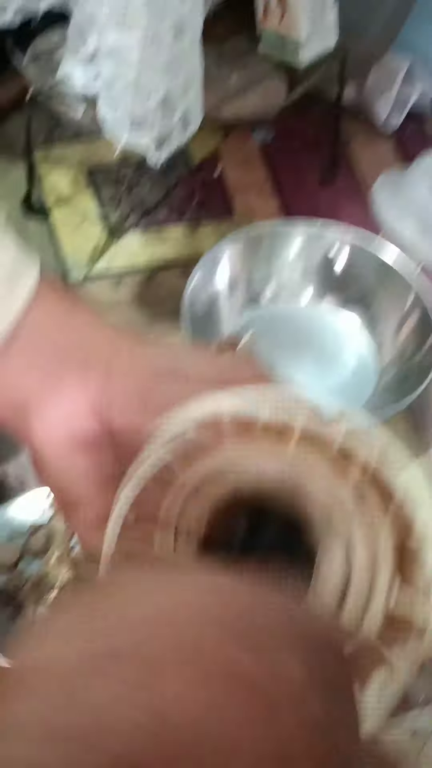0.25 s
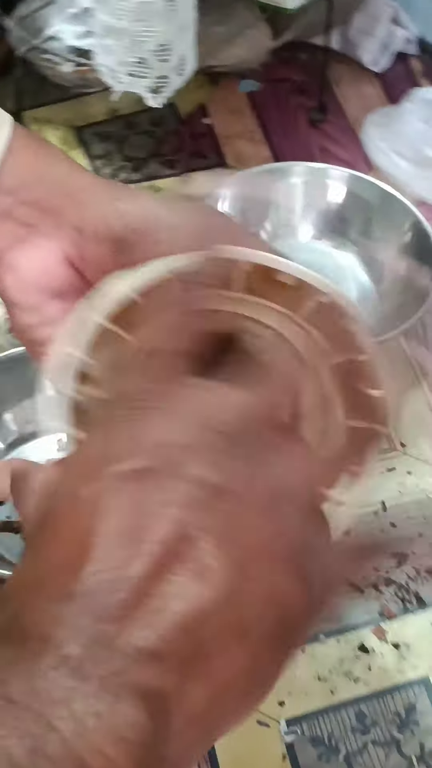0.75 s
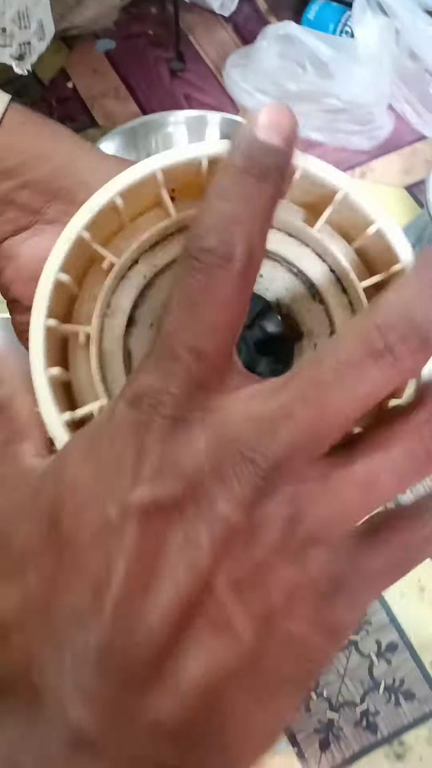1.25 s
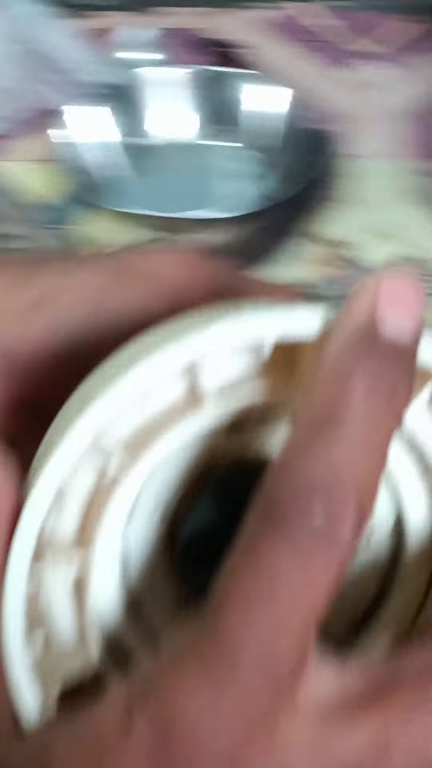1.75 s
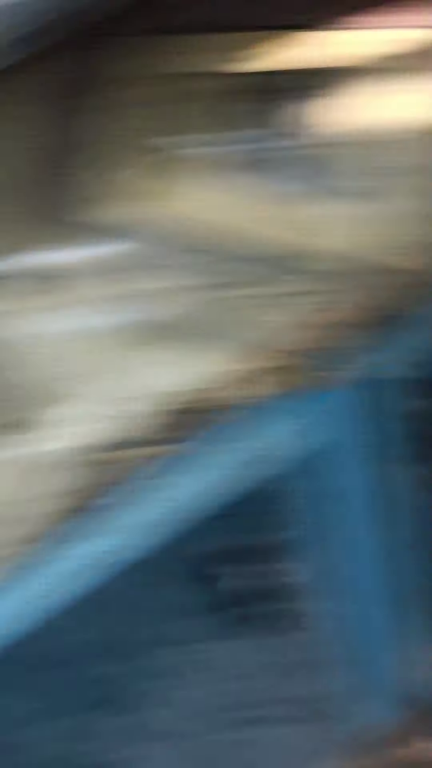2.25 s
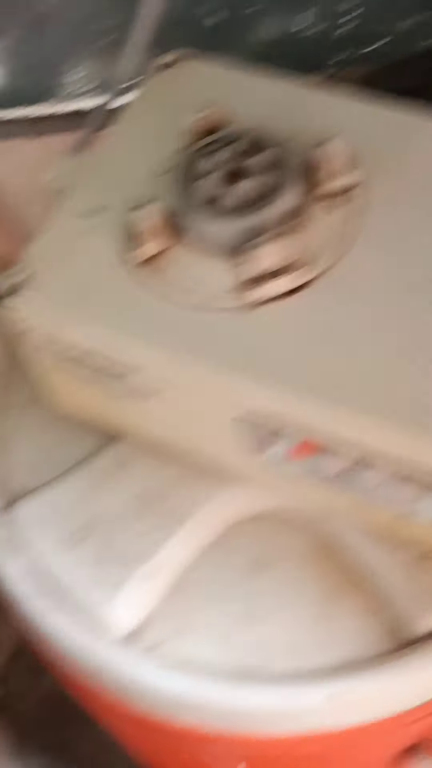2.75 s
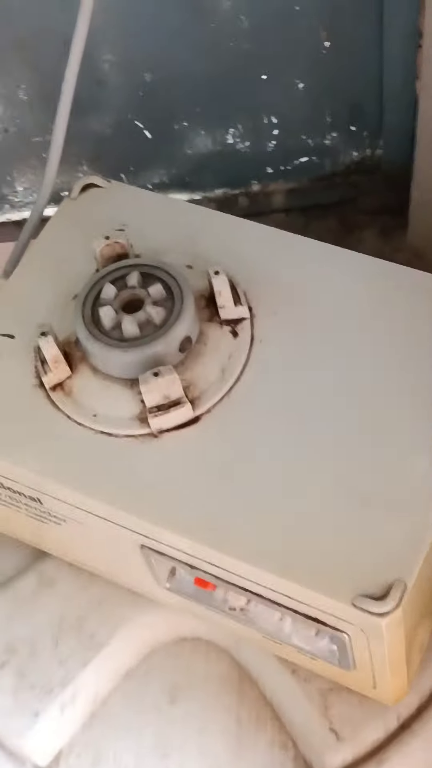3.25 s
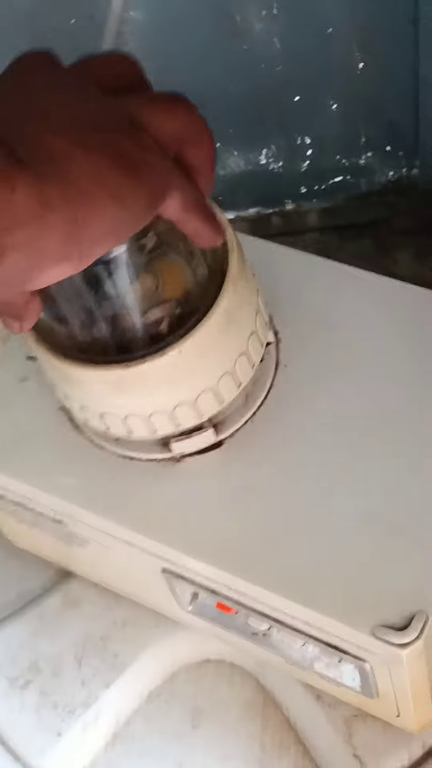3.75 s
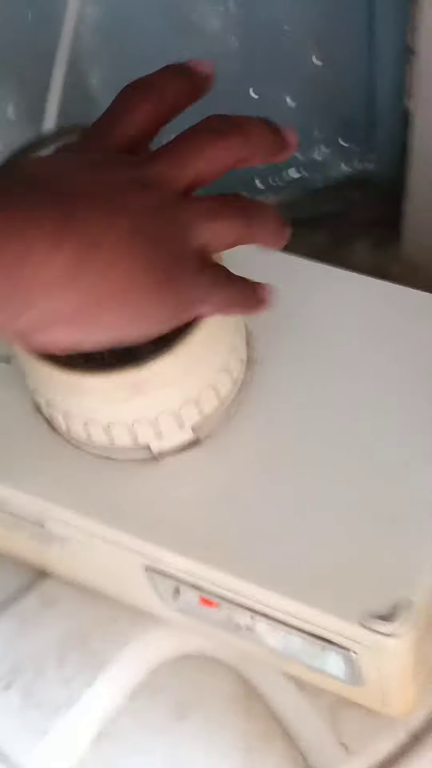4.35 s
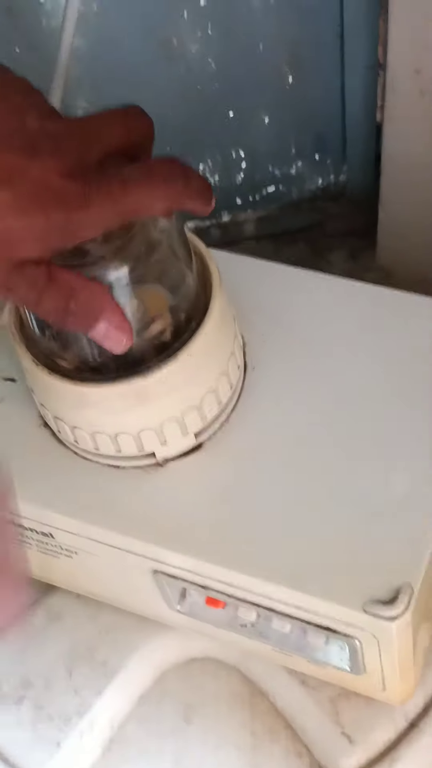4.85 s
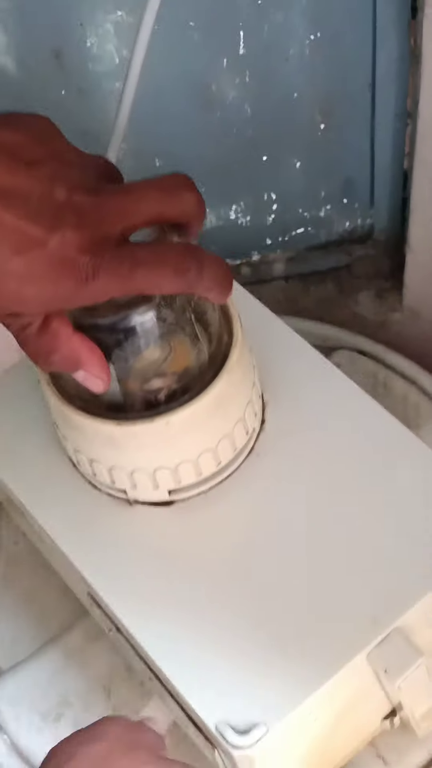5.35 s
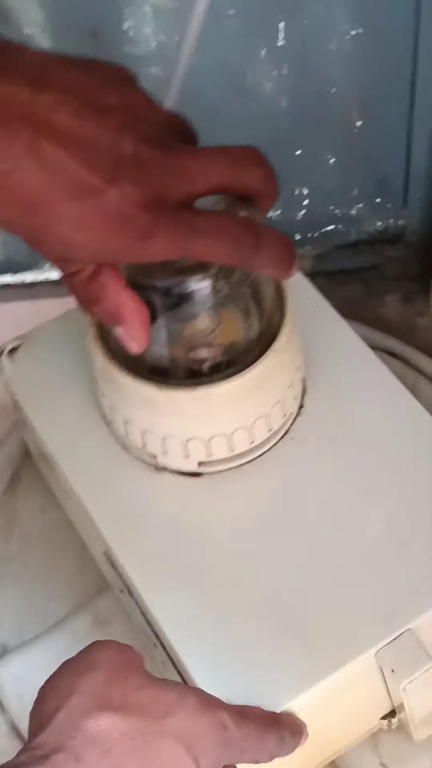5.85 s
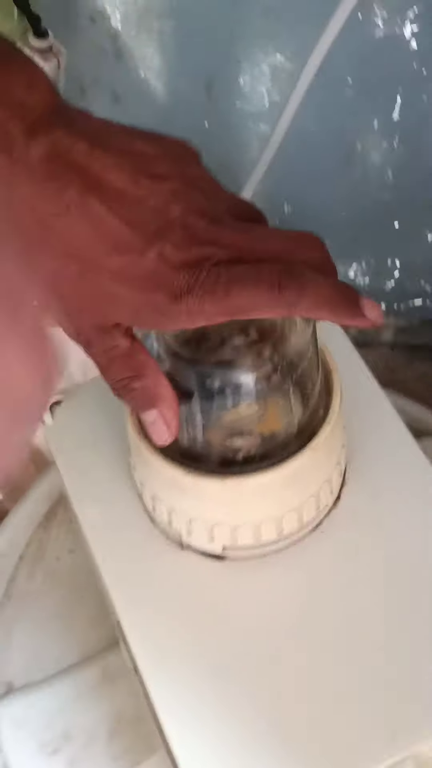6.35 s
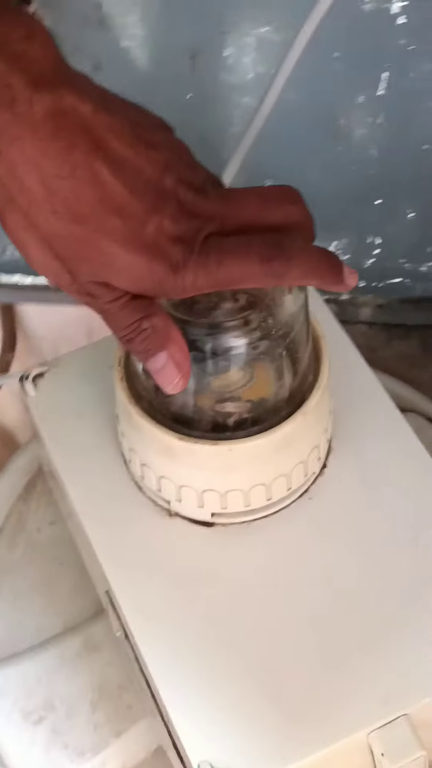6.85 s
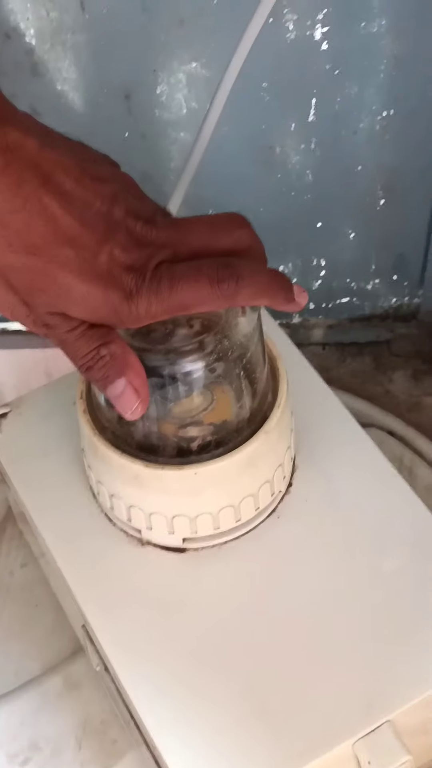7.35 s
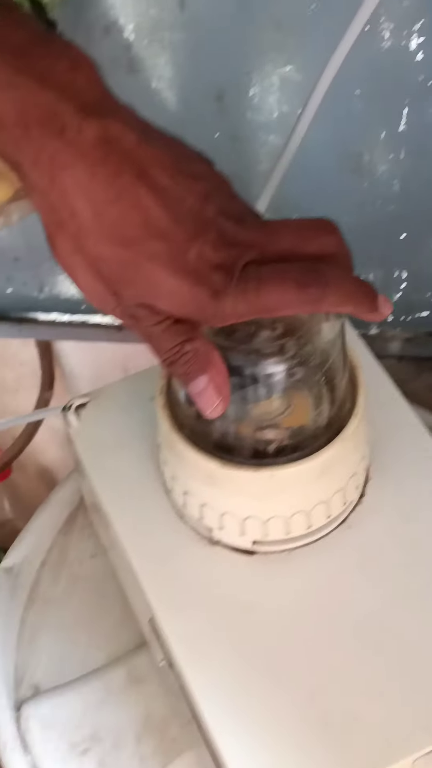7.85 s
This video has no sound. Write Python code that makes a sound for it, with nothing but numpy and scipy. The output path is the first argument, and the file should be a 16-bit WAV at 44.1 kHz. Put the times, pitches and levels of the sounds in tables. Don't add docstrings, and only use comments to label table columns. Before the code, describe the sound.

Close, dry phone pickup in a small quiet room, with tails clipped about a tenth of a second after each blow. At 0.2 s a plastic lid knocks on its thread with a short seed rustle; a harder, hollow knock comes at 0.58 and a soft one at 0.83. Faint rubbing and tiny squeaks continue to about 1.9. From 2.05 the jar tips: dry seeds and pods crack and rattle on glass, bright and irregular, busiest at 2.25-2.6 and 3.0-3.25, with a last small pour at 3.5. At 3.81 and 4.05 two strong clanks hit a hollow appliance casing, boxy and low-ringing, with lesser knocks between. Light rubbing follows; around 5.3-5.4 the casing is nudged with scrapes and knocks, and at 5.9 gives a low, soft thump. After 6.2 only faint seed ticks, slight squeaks and very quiet room noise remain until about 8.

```python
import sys
import numpy as np
from scipy import signal
from scipy.io import wavfile
from scipy.ndimage import uniform_filter1d

SR = 44100
rng = np.random.default_rng(int(sys.argv[2]) if len(sys.argv) > 2 else 0)


def invert_db(level):
    return 10 ** (np.asarray(level, dtype=float) / 20)


def digitize_waveform(pressure):
    field = np.atleast_2d(pressure).T
    bounded = np.clip(field, -1, 1)
    quanta = np.round(bounded * 32767).astype(np.int16)
    wavfile.write(sys.argv[1], SR, quanta)


N = 358091

# frequency in Hz, density in dB per Hz.
GLASS_SPECTRUM = [(880, -107.5), (1500, -10.5), (2320, -20), (2540, 3.5), (3940, 5.5), (4380, 9.5),
                  (4970, 5), (6300, 6), (7300, 1), (8200, -12), (10400, -53), (17600, -120)]
# frequency in Hz, density in dB per Hz.
HELD_SPECTRUM = [(880, -60), (1500, -8), (2300, -5), (3000, 6), (4300, 5), (5300, 0.5), (6300, 2.5),
                 (7300, -3), (8300, -16), (10400, -50), (17600, -120)]
# frequency in Hz, width in Hz, level in dB.
GLASS_MODES = [(2750, 290, 3.5), (4250, 160, -1.5), (5650, 170, 11), (6480, 300, -6)]
# frequency in Hz, density in dB per Hz.
GRIT_SPECTRUM = [(5500, -34), (7600, -6), (8400, -5), (9000, -1), (10800, 0), (12200, -6), (13400, -9),
                 (15000, 2), (15900, 1)]
# time in seconds, share from 0 to 1.
LOOSE_SEEDS = [(0, 0), (2.0, 0), (2.06, 1), (3.44, 1), (3.48, 0), (8.2, 0)]
# start in seconds, peak in dB, pitch in Hz, rustle in dB.
POD_HITS = [(2.24, -37, 4600, -10), (2.2785, -22, 4500, -22), (2.341, -32, 4600, -20),
            (2.364, -36, 6000, -16), (2.5025, -24, 4300, -20), (2.265, -11, 5970, -25),
            (2.2693, -14, 5400, -16.5), (2.308, -9, 4700, -15), (2.331, -30, 4670, -23),
            (2.3516, -28.5, 5490, -16), (2.393, -32.5, 5860, -8.5), (2.7189, -28.5, 5400, -8.5),
            (2.9287, -27, 4600, -5.5), (3.01, -14, 6300, -12.5), (3.0568, -13, 4600, -8),
            (3.0588, -15, 6200, -20), (3.062, -19, 5500, -20), (3.072, -19, 4400, -20),
            (3.1437, -22, 4530, -8), (3.15, -20, 6500, -12), (3.168, -26, 4500, -20),
            (2.6627, -38, 6000, -6), (3.1948, -15, 5160, -6), (3.232, -34, 6400, 1),
            (3.8131, -17, 2970, -18), (4.0498, -23.5, 2750, -7.5)]
# start in seconds, peak in dB, pitch in Hz, rustle in dB.
HUSK_HITS = [
    (2.0756, -45, 3330, -12),
    (2.2045, -47, 6800, -24),
    (2.4425, -20, 9000, -6),
    (2.5685, -14, 4900, -22),
    (2.6885, -33.5, 10600, -2.5),
    (2.7385, -51, 2580, 4),
    (6.5662, -49.5, 4200, -15),
]
# start in seconds, peak in dB, bass share in dB, struck spot in Hz, spot in dB.
CASING_BLOWS = [(3.813, -5, -9.5, 1230, -8.5), (3.888, -14.5, -7, 1110, -9.5),
                (3.951, -22.5, 4, 1110, -4.5), (4.012, -20, 3, 430, 0.5), (4.037, -16, -6, 1110, -6),
                (4.051, -3, -8, 1110, -6), (4.257, -36, 3, 1400, -2), (4.337, -34.5, -11, 2160, -6),
                (5.297, -22.5, -1, 1040, -27), (5.357, -20.5, -38, 850, -2), (5.414, -30, -12, 643, 0.5),
                (5.912, -30, 20, 1090, -22), (6.175, -55, 2.5, 942, -11)]
# frequency in Hz, level in dB, 60 dB decay time in seconds.
CASING_MODES = [(110, -26.5, 0.44), (146.5, 8.5, 0.82), (190.5, -4, 0.43), (234.6, -13.5, 0.23),
                (266, 11, 0.2), (298, 4, 0.15), (397, -6, 0.24), (449, -1.5, 0.16), (588.4, -9, 0.17),
                (668, -10, 0.14), (910, -19.5, 0.36), (1110, -14, 0.2), (1261.6, -12, 0.155),
                (1370, -8.5, 0.13), (1753, -2.5, 0.032), (2100, -19.5, 0.041), (2536, -11.5, 0.12),
                (2970, -28, 0.059), (3300, -18, 0.086), (4380, -17.5, 0.021)]
# start in seconds, peak in dB, bass share in dB, struck spot in Hz, spot in dB.
LID_KNOCKS = [
    (0.216, -15.5, 6.5, 305, -2),
    (0.579, -12.5, 5.5, 1110, -7),
    (0.832, -37.5, 25, 577, 0),
]
# frequency in Hz, level in dB, 60 dB decay time in seconds.
LID_MODES = [(274.4, -6.5, 0.13), (414, 6.5, 0.031), (468, -8, 0.32), (730, 6.5, 0.036), (900, 14.5, 0.027),
             (918, -12, 0.068), (1114, 3, 0.062), (1285, 5.5, 0.073), (2250, 11, 0.022), (3090, -6, 0.056),
             (4300, -26.5, 0.091)]
# frequency in Hz, density in dB per Hz.
PLASTIC_SPECTRUM = [(290, 0.5), (500, -7.5), (543, -15), (665, 1.5), (802, -3), (1140, -0.5), (1500, 1),
                    (1900, -4), (3000, -7.5), (3900, -16), (6600, -120)]

# start in seconds, fall in seconds, then plastic, seeds and grit in dB.
JOLTS = [(0.21, 0.11, -41, -29, -39), (0.572, 0.14, -36, -32, -36), (0.83, 0.072, -38.5, -43, -61),
         (2.071, 0.19, -52.5, -52.5, -60), (2.195, 0.041, -45.5, -45, -35.5), (2.259, 0.067, -74, -24, -49),
         (2.3, 0.13, -76, -34.5, -60), (2.564, 0.04, -59, -25, -65), (3.14, 0.05, -63, -23.5, -59),
         (3.189, 0.07, -66, -31.5, -47), (3.809, 0.042, -20, -46, -54), (4.048, 0.14, -31, -41.5, -46),
         (4.256, 0.07, -52, -82, -89), (4.332, 0.12, -51, -76, -79), (5.351, 0.075, -27, -36, -54),
         (6.56, 0.051, -61, -41.5, -55)]
JOLT_FALL_DB = [30.5, 20, 22.5]
JOLT_BEND = [1.4, 1.8, 1.9]
# start in seconds, length in seconds, then plastic, seeds and grit in dB.
POURS = [
    (2.446, .11, -36.5, -27.5, -38),
    (3.014, 0.13, -29.5, -21.5, -34.5),
    (3.509, 0.11, -36.5, -34, -56),
]
POUR_SHARE = [.95, 1.02, .88]
# middle in seconds, half length in seconds, then plastic, seeds, grit in dB.
STROKES = [(.14, 0.14, -39, -36.5, -44), (0.42, 0.2, -56, -45, -60.5), (.52, .07, -56, -47, -70),
           (.9, .1, -58, -47, -66), (1.011, 0.11, -51.5, -41.5, -55), (1.13, 0.19, -49, -57, -83),
           (1.512, 0.11, -42, -38.5, -60), (1.77, 0.035, -50.5, -54.5, -62.5), (2.64, 0.079, -62, -45, -63),
           (2.746, 0.019, -62, -31, -66), (2.432, .016, -62, -44, -46), (2.5, .035, -60, -32, -60),
           (2.903, 0.12, -63, -44, -58.5), (3.378, 0.13, -60, -49.5, -54), (3.987, 0.15, -34.5, -62, -64.5),
           (4.677, 0.14, -50, -51.5, -59.5), (5.291, 0.1, -34.5, -39.5, -51),
           (5.744, 0.054, -68.5, -55, -64), (5.947, 0.073, -57, -73.5, -65), (6.385, 0.15, -75, -60.5, -69),
           (6.914, 0.14, -78, -52, -61.5), (7.404, 0.18, -73, -60, -74.5),
           (7.657, 0.073, -79.5, -61, -58.5)]
REST_DB = [-75.5, -74.5, -81]

# peak in seconds, rise in seconds, fall in seconds, level in dB.
PUSHES = [(.05, .1, .2, -59), (.225, 0.034, 0.095, -21.5), (.58, 0.02, 0.078, -21.5),
          (.854, 0.064, 0.6, -49), (1.44, 0.12, 0.43, -63.5), (1.88, 0.14, 0.65, -61.5),
          (2.385, 0.074, 0.16, -48.5), (2.86, 0.056, 0.08, -50), (3.11, 0.23, 0.06, -45),
          (3.5, 0.11, 0.28, -47.5), (3.85, 0.024, 0.14, -18.5), (4.08, .13, 0.096, -17),
          (4.42, .15, .1, -51.5), (4.6, 0.082, 0.19, -54), (4.78, 0.19, 0.041, -46.5),
          (5.02, 0.093, .1, -55.5), (5.28, 0.083, .1, -28.5), (5.42, 0.11, 0.042, -29),
          (5.62, 0.13, 0.33, -49.5), (5.941, 0.015, 0.115, -22), (6.19, 0.053, 0.074, -44),
          (7.1, 1, 0.75, -59.5), (8.1, 0.56, .3, -65.5)]
# frequency in Hz, density in dB per Hz.
TABLE_SPECTRUM = [(29, -49.5), (50, -50), (107, -45.5), (146, -4.5), (203, -17.5), (316, -7), (426, -31),
                  (620, -29), (700, -38.5), (910, -55.5), (1540, -120)]
# time in seconds, level in dB.
DEEP_SHARE = [(0, -28), (1.25, -45), (1.4, 2), (5.1, 9), (5.2, -5), (5.36, -22), (5.5, -3.5), (5.9, 5),
              (6.1, 4.5)]
# start in seconds, length in seconds, pitch in Hz, level in dB.
SQUEAKS = [(.3, 3.7, 178.9, -66.5), (.91, 0.052, 3300, -54), (.99, 0.085, 440, -49),
           (.99, 0.053, 4640, -58), (1.14, 0.13, 4100, -57), (7.47, 0.064, 3440, -66),
           (1.38, 0.13, 178, -51), (1.42, 0.037, 1620, -50), (1.59, 0.041, 738, -44),
           (1.062, 0.13, 438, -54.5), (2.71, 0.1, 2550, -57), (2.713, .016, 2640, -40),
           (2.735, 0.014, 2600, -39), (2.236, .11, 2700, -47), (2.306, .018, 9300, -47),
           (3.14, .03, 9300, -46), (3.192, .048, 9300, -48), (3.15, .045, 4500, -39),
           (4.335, .09, 600, -54), (3.893, .016, 4650, -48), (4.14, 0.112, 145.7, -43),
           (4.251, 0.023, 2000, -55), (4.425, .055, 6610, -63), (6.8, 0.072, 3400, -58.5),
           (6.98, 0.15, 3580, -58.5), (7.04, 0.18, 315, -51), (7.35, 0.053, 4800, -65.5),
           (5.542, 0.12, 4300, -65), (7.92, 0.094, 319, -57), (7.92, 0.12, 1526, -69.5)]
# start in seconds, length in seconds, pitch in Hz, level in dB.
SCUFFS = [(0.56, 0.039, 399, -31.5), (5.961, 0.096, 1000, -60.5), (5.907, 0.0334, 260, -29.5),
          (1.065, .24, 927, -57), (3.592, 0.24, 1970, -52.5), (4.11, 0.12, 3700, -51),
          (4.371, 0.091, 305, -48.5), (4.563, 0.23, 2040, -58), (.2, .03, 420, -33), (2.44, .05, 1100, -45),
          (2.715, .07, 1850, -54), (.06, .14, 1500, -47), (3.9, .12, 4100, -52), (.71, .12, 4200, -63),
          (6.82, .16, 5700, -60), (7.33, .14, 5500, -64), (7.6, .1, 5700, -63), (5.362, .03, 1000, -33),
          (5.255, .04, 1700, -42), (5.235, .07, 3900, -48), (2.63, .04, 10000, -61),
          (2.688, .03, 10800, -42), (5.386, .13, 663, -51.5), (5.587, 0.081, 305, -53),
          (6.549, 0.078, 2750, -55.5), (6.678, 0.095, 3510, -63), (6.993, .09, 4530, -54.5),
          (7.82, 0.09, 159, -57)]
# time in seconds, level in dB.
RUMBLE_LEVEL = [(0.0, -63.5), (1.04, -81), (4.34, -67.5), (8.12, -82)]
# frequency in Hz, density in dB per Hz.
ROOM_SPECTRUM = [(12, -72.5), (20, -30.5), (43, -31), (172, 8.5), (240, -25.5), (309, 1), (920, -14),
                 (2450, -18), (3930, -16), (6690, -21.5), (8360, -33), (13400, -27), (15900, -25.5)]
# start in seconds, length in seconds, lowest Hz, share in dB.
UNLIKE_HISS = [
    (2.187, 0.15, 8950, -11),
    (2.273, 0.0092, 7100, -20),
    (2.296, 0.028, 5200, -19),
    (2.411, 0.044, 5030, -4),
    (2.559, 0.012, 4600, -6),
    (2.678, 0.075, 9100, -18),
    (3.134, 0.019, 4300, -7),
    (3.184, 0.013, 7050, -10),
]


def evened(x):
    return x / np.sqrt(np.mean(x ** 2) + 1e-20)


def read(points, hz):
    f, value = np.transpose(points)
    return np.interp(np.log(hz + 1), np.log(f + 1), value)


def follow(rows, column):
    rows = np.array(rows)
    return np.interp(np.arange(N) / SR, rows[:, 0], rows[:, column])


def add(mix, s, sound):
    part = mix[round(s * SR):][:len(sound)]
    part += sound[:len(part)]


def filtered(x, order, hz, kind="low"):
    return signal.sosfilt(signal.butter(order, hz, kind, fs=SR, output="sos"), x)


def resonate(x, hz, width):
    r = np.exp(-np.pi * abs(width) / SR)
    return 2 * signal.lfilter([1 - r], [1, -r * np.exp(2j * np.pi * hz / SR)], x).real


def coloured(x, spectrum, patchy_db, size=(3, 16)):
    hz, t, z = signal.stft(x, SR, nperseg=512, noverlap=384)
    patches = rng.standard_normal(z.T.shape).T
    patches = uniform_filter1d(patches, size=size[0], axis=0)
    patches = evened(uniform_filter1d(patches, size=size[1], axis=1))
    z = z * invert_db(read(spectrum, hz)[:, None] + patchy_db * patches)
    return evened(signal.istft(z, SR, nperseg=512, noverlap=384)[1][:len(x)])


def grains(per_s, spread_db, tail_s, tail_db):
    size = invert_db(spread_db * np.minimum(rng.exponential(1, N), 5)) * rng.choice([-1, 1], N)
    clicks = size * (rng.random(N) < per_s / SR)
    t = np.arange(2000) / SR
    tail = rng.standard_normal(2000) * invert_db(-60 * t / tail_s)
    tail = tail / np.linalg.norm(tail)
    return clicks + invert_db(tail_db) * signal.oaconvolve(clicks, tail)[:N]


def bumps(s, rise, fall, db, edge_db, bend, rest_db):
    t = np.arange(0, N + 32, 32)[:, None] / SR
    away = np.where(t < s, (s - t) / np.abs(rise), (t - s) / np.abs(fall))
    power = np.where(t < s, min(bend, 1.5), bend)
    level = invert_db(db - edge_db * away ** power).sum(1) + invert_db(rest_db)
    return np.interp(np.arange(N) / SR, t[:, 0], level)


def contact(layer):
    edge_db, jolt_rise_s, pour_rise_s = 15.5, 0.0088, 0.012
    s, fall, *db = np.transpose(JOLTS)
    hard = bumps(s + jolt_rise_s, jolt_rise_s, fall, db[layer], JOLT_FALL_DB[layer], JOLT_BEND[layer],
                 REST_DB[layer])
    s, length, *db = np.transpose(POURS)
    pour = bumps(s, pour_rise_s, length * POUR_SHARE[layer], db[layer], edge_db, 6.6, -np.inf)
    s, half, *db = np.transpose(STROKES)
    stroke = bumps(s, half, half, db[layer], edge_db, 1.99, -np.inf)
    return np.array([hard, pour + stroke])


def slide():
    ticks = grains(3000, 2.8, 0.029, 10.0)
    free = coloured(ticks, GLASS_SPECTRUM, 3.5, size=(9, 10))
    ring = evened(sum(invert_db(db) * evened(resonate(ticks, hz, width)) for hz, width, db in GLASS_MODES))
    loose = follow(LOOSE_SEEDS, column=1)
    body = loose * free + (1 - loose) * coloured(ticks, HELD_SPECTRUM, 4.5)
    grit = contact(layer=2).sum(0) * coloured(ticks, GRIT_SPECTRUM, 2.2)
    return invert_db(-7.5) * contact(layer=1).sum(0) * evened(body + 0.14 * ring) + grit


def pods():
    crack_s, rustle_t60 = 0.0008, 0.13
    out, t = np.zeros(N), np.arange(5000) / SR
    crack_shape = (t / crack_s * np.exp(1 - t / crack_s)) ** 3 * 0.8
    for hits, top_db in [(POD_HITS, -40), (HUSK_HITS, 6)]:
        for s, db, hz, rustle_db in hits:
            noise = rng.standard_normal(len(t))
            top = invert_db(top_db) * coloured(noise, GRIT_SPECTRUM, 0.79)
            rustle = coloured(noise, GLASS_SPECTRUM, 2.2) + 0.89 * evened(resonate(noise, hz, 500)) + top
            crack = (np.sin(2 * np.pi * hz * t) + 0.55 * evened(rustle)) * crack_shape
            fade = invert_db(rustle_db - 8.5 - 60 * t / rustle_t60) * np.minimum(t / 0.0018, 1)
            add(out, s, invert_db(db) * (crack + fade * rustle))
    return filtered(out, 4, 2000, "high")


def knocks(events, modes, split_hz, bass_rise_s, rattle, rattle_t60, thud, hold):
    out, t = np.zeros(N), np.arange(11000) / SR
    gaps, harder = np.diff(np.array(events)[:, :2], axis=0, append=np.inf).T
    gaps[harder < 0] = np.inf
    push = thud * np.sin(2 * np.pi * 1000 * t) * np.exp(-((t - 0.0012) / 0.0006) ** 2)
    for (s, peak_db, bass_db, spot_hz, spot_db), gap in zip(events, gaps):
        drive = rattle * rng.standard_normal(len(t)) * invert_db(-60 * t / rattle_t60)
        drive[0] = 1
        ring = 0
        for (hz, db, t60), own_db in zip(modes, 2.16 * rng.standard_normal(len(modes))):
            rise = 1 - np.exp(-t / (bass_rise_s * (150 / hz) ** 2))
            own_hz = hz * (1 + 0.006 * own_db * (hz > split_hz))
            mode = resonate(drive, own_hz, 2.2 / t60) * t60 * SR / (4.4 * np.pi)
            ring = ring + invert_db(db + own_db + bass_db * (hz < split_hz)) * rise * mode
        spot = resonate(resonate(rng.standard_normal(len(t)), spot_hz, 250), spot_hz, 250)
        spot = invert_db(spot_db - 60 * t / 0.11) * evened(spot)
        sound = ring / abs(ring).max() + push + spot
        late = np.maximum(t - min(hold, gap - 0.01), 0)
        gate = invert_db(-np.minimum(late * 600, 22) - 341 * late)
        add(out, s - 0.001, invert_db(peak_db - 4.5) * sound * gate * np.minimum(t / 0.0014, 1))
    return filtered(out, 4, 5000)


def rub():
    body = coloured(grains(1500, 1.7, 0.048, 1.1), PLASTIC_SPECTRUM, 2.54)
    hard, light = contact(layer=0)
    thin = filtered(body, 2, 920, "high")
    return invert_db(-4.0) * (hard * body + light * thin)


def hum():
    push = rng.standard_normal(N)
    modes = sum(invert_db(db / 2) * evened(resonate(resonate(push, hz, 8.6), hz, 50))
                for hz, db, t60 in CASING_MODES[:8])
    body = evened(evened(modes) + 1.74 * coloured(push, TABLE_SPECTRUM, 2.0))
    deep = signal.sosfiltfilt(signal.butter(4, 200, fs=SR, output="sos"), body)
    weight = bumps(*np.transpose(PUSHES), edge_db=23.5, bend=1, rest_db=-72.5)
    return invert_db(-6.0) * weight * (body - deep + invert_db(follow(DEEP_SHARE, column=1)) * deep)


def squeaks():
    out = np.zeros(N)
    for events, wide in [(SQUEAKS, 2.4), (SCUFFS, 7.5)]:
        for s, length, hz, db in events:
            width = wide * np.sqrt(hz) * min(hz / 1500, 1) ** 0.5
            samples = round(length * SR)
            noise = rng.standard_normal(samples + 4000)
            tone = resonate(resonate(noise, hz, width), hz, width)[2000:][:samples]
            add(out, s, invert_db(db) * evened(tone) * signal.windows.tukey(len(tone), 0.6))
    return out


def rumble():
    low = resonate(resonate(rng.standard_normal(N), 62, 44), 62, 44)
    return invert_db(follow(RUMBLE_LEVEL, column=1)) * evened(low)


def room_floor():
    hz, t, z = signal.stft(rng.standard_normal(N), SR, nperseg=2048)
    noise = signal.istft(z * invert_db(read(ROOM_SPECTRUM, hz))[:, None], SR, nperseg=2048)[1][:N]
    return invert_db(-61.5) * coloured(noise, [(20, 0), (20000, 0)], 4.0)


def scene():
    lid = knocks(LID_KNOCKS, LID_MODES, split_hz=600, bass_rise_s=0.015, rattle=0.032, rattle_t60=0.29,
                 thud=2.1, hold=0.13)
    casing = knocks(CASING_BLOWS, CASING_MODES, split_hz=350, bass_rise_s=0.013, rattle=0.046, rattle_t60=0.2,
                    thud=0.13, hold=0.086)
    near = slide() + pods() + lid + casing + rub() + hum() + squeaks()
    mono = filtered(near, 4, 95, "high") + rumble() + room_floor()
    return np.array([mono, mono])


def top_cut(x):
    return signal.sosfilt(signal.butter(12, 16950, fs=SR, output="sos"), x)


def record(dry):
    ceiling, side = 1.2, np.zeros(N)
    signs = rng.choice([-1, 1], size=N // 20 + 1).repeat(20)[:N]
    unlike = dry[0] * signs
    for s, length, hz, db in UNLIKE_HISS:
        treble = filtered(unlike, 6, hz, "high")
        part = treble[round(s * SR):][:round(length * SR)]
        add(side, s, invert_db(db) * part * np.hanning(len(part)))
    pair = ceiling * np.tanh(dry / ceiling) + np.array([side, -side])
    low_pass = signal.firwin(511, 15850, window=("kaiser", 9), fs=SR)
    finished = signal.oaconvolve(pair, low_pass[None], "same")
    return top_cut(finished)


dry = scene()
out = record(dry)
digitize_waveform(out)
```